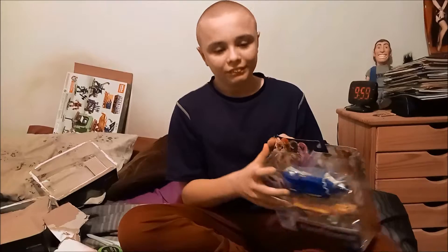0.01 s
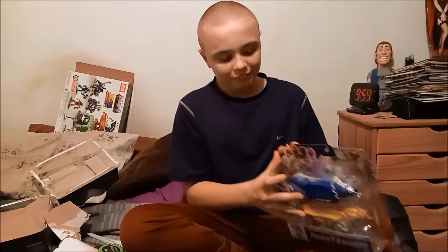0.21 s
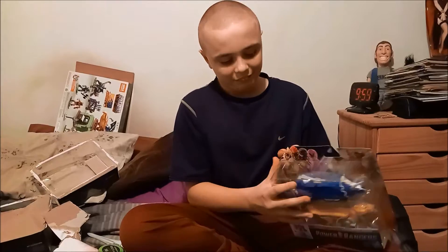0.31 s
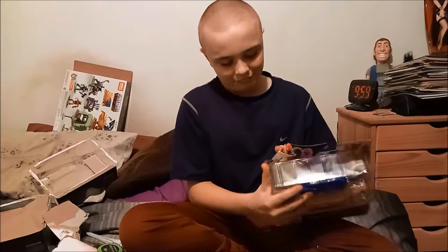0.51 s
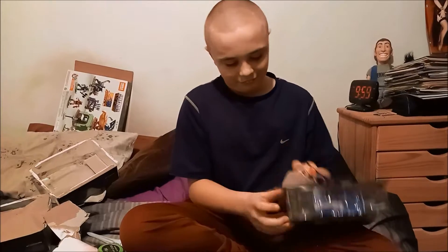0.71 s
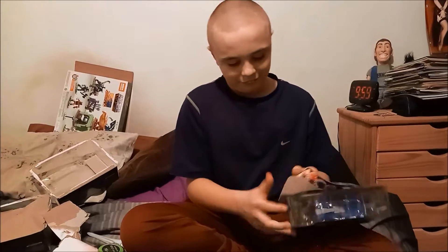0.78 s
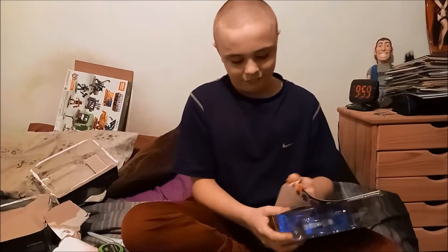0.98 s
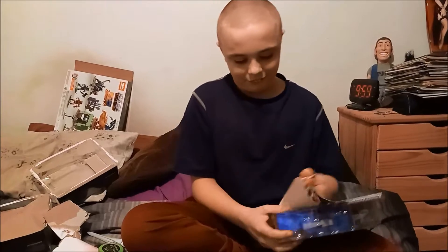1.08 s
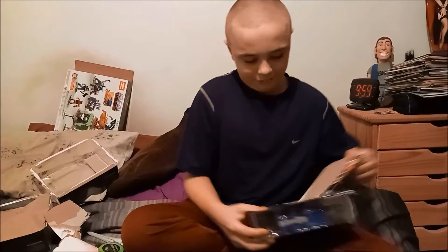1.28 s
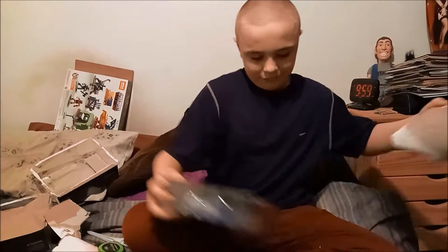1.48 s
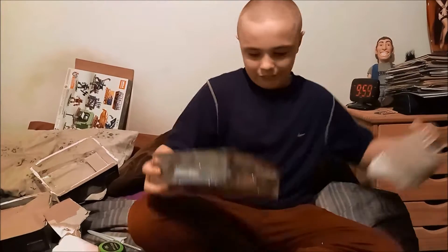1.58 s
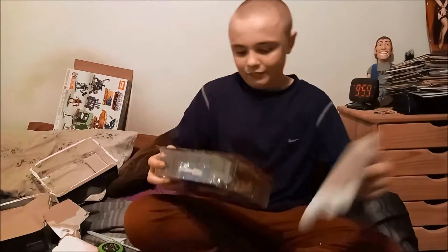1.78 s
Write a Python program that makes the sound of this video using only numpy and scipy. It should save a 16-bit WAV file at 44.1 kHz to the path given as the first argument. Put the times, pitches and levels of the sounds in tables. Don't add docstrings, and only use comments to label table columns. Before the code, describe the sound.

A stiff card is pulled from a hard plastic tray: faint knocks first, then dense scraping with sharp snaps and hollow thuds, ending in strong knocks and small clicks, in a small furnished bedroom, close mono microphone.

```python
import sys
import numpy as np
from scipy import signal
from scipy.fft import rfft, irfft
from scipy.io import wavfile
from scipy.ndimage import uniform_filter1d

SR = 44100
rng = np.random.default_rng(int(sys.argv[2]) if len(sys.argv) > 2 else 0)


def undo_db(level):
    steps = np.asarray(level, float) / 20
    return 10 ** steps


def wrap_up_sound(samples):
    columns = np.atleast_2d(samples).T
    tamed = np.clip(columns, -1, 1)
    steps = np.round(tamed * 32767).astype(np.int16)
    wavfile.write(sys.argv[1], SR, steps)


N = 79380

# frequency in Hz, level in dB.
FLOOR_COLOUR = [(40, -16), (300, -32), (1100, -24), (2200, -9), (4000, -10), (8000, -41), (16000, -50)]
# frequency in Hz, time to fall by 60 dB in seconds.
ROOM_DECAY = [(200, 0.16), (1000, 0.14), (4000, 0.14), (8000, 0.2), (15000, 0.2)]
# pitch in Hz, level in dB, time to fall by 60 dB in seconds.
LEFTOVER_RINGS = [(1150, -58.5, 0.23), (2120, -76.5, 1)]
# start in seconds, level in dB, pitch in Hz.
LAP_BUMPS = [(.09, -51, 91), (0.147, -44, 150), (0.25, -50, 87.5), (0.547, -33.5, 137), (0.686, -31, 134),
             (0.87, -47, 112), (1.267, -27, 111), (1.129, -36.5, 107), (1.508, -40, 101), (1.6, -52.5, 99),
             (1.74, -60.5, 89)]
# time in seconds, pitch in Hz, level in dB.
SQUEAK_PATH = [
    (0, 3530, -66),
    (.045, 3440, -66),
    (.07, 3200, -66),
    (.1, 2900, -67),
    (.145, 2600, -78),
]
# time in seconds, pitch in Hz, level in dB.
HOLLOW_PATH = [
    (.9, 740, -95),
    (1.0, 670, -52),
    (1.08, 718, -44),
    (1.14, 480, -41.5),
    (1.21, 444, -44),
    (1.29, 360, -33.5),
    (1.33, 315, -70),
    (1.4, 310, -89),
]
# start in seconds, pitch in Hz, level in dB, time to fall by 60 dB in seconds.
WALL_PINGS = [(.59, 478, -41, 0.27), (0.6383, 2450, -48, 0.025), (.643, 2460, -42, 0.034),
              (.643, 4600, -32, 0.023), (.6835, 1046, -33, 0.035), (0.709, 1020, -30, 0.039),
              (0.821, 1050, -36, 0.054), (.8445, 2270, -35.5, 0.066), (0.855, 3270, -26, 0.043),
              (.858, 5180, -33, 0.058), (1.343, 633, -16, 0.045), (1.3465, 391, -20, 0.058),
              (1.357, 520, -25.5, 0.055), (1.4595, 1150, -24, 0.033), (1.46, 623, -27, 0.026),
              (1.46, 3160, -37.5, 0.017), (1.689, 1100, -36.5, 0.032), (1.688, 1600, -38, 0.029),
              (1.689, 2250, -39.5, 0.036), (1.689, 3530, -45, 0.031), (1.689, 4790, -47, .04)]
# start in seconds, level in dB, pitch in Hz, time to fall by 60 dB in seconds.
CARD_THUDS = [(.002, -48.5, 259, 0.062), (0.095, -48.5, 520, 0.037), (0.143, -37.5, 500, 0.024),
              (0.15, -36, 430, 0.016), (0.165, -32, 372, 0.018), (0.179, -48, 400, 0.022),
              (0.193, -45, 435, 0.028), (.209, -35, 334, 0.031), (0.224, -29.5, 346, 0.025),
              (0.2441, -27.5, 429, 0.059), (0.259, -25, 500, 0.022), (0.304, -28.5, 498, 0.079),
              (0.383, -21.5, 463, 0.042), (.454, -28, 465, 0.029), (.544, -23, 489, 0.022),
              (.59, -31, 414, 0.043), (.705, -20.5, 450, 0.03), (0.863, -25.5, 440, 0.024),
              (1.093, -27.5, 475, 0.1), (1.135, -26, 475, 0.064), (1.155, -27.5, 411, 0.054),
              (1.192, -24.5, 437, 0.1), (1.222, -22, 542, 0.053), (1.25, -23, 347, 0.049),
              (1.294, -14.5, 334, 0.051), (1.338, -21.5, 630, 0.039), (1.346, -12, 428, 0.027),
              (1.457, -17, 439, 0.018), (1.52, -39.5, 223, 0.061), (1.55, -48.5, 266, 0.047)]
# pitch as a ratio to the thud's own, level in dB.
THUD_TONES = [(.3, -24.5), (.68, -4.5), (1, 5), (1.55, 0), (2.3, 4.5), (3.4, -0.5)]
# start in seconds, level in dB, pitch in Hz, bright crack in dB, dull ring in dB.
PLASTIC_SNAPS = [(.084, -56, 6100, 0, -15), (0.144, -45.5, 6770, 0, 0), (.169, -45, 1900, -6, -10),
                 (.1925, -56, 7000, -4, -3), (.2102, -51, 2600, 2, -10), (0.229, -45, 6600, -7, 2.5),
                 (0.245, -17, 1810, -5, 0), (0.3061, -23, 7700, 7.5, 0.5), (0.384, -21.5, 2860, -9, 2.5),
                 (0.546, -39.5, 6360, 11, 10), (0.5909, -34, 4100, -10, -3), (0.6377, -29, 4580, 10, -16),
                 (0.639, -24.5, 4770, -1, -20), (0.6421, -20.5, 6730, -12, -5.5),
                 (0.6835, -31, 6700, 1, -4.5), (0.706, -30, 6600, 3, -1), (0.779, -33, 4900, 3, -6),
                 (0.825, -27, 2730, -8, -10), (.844, -21.5, 2460, -9, -4), (0.858, -18.5, 7100, 2.5, -29),
                 (0.865, -25, 5200, -1, -37), (1.079, -30, 6150, -3, -30), (1.3192, -25, 5300, 5, 0.5),
                 (1.4602, -36.5, 6800, -3, -12), (1.5177, -50, 6520, -4, -20),
                 (1.5362, -48, 6700, -2.5, -20), (1.606, -45, 6600, 5.5, -37), (1.6483, -41, 7600, -1, -31),
                 (1.6665, -47, 6140, 6, -6), (1.689, -27.5, 6610, -3, -7.5), (1.693, -38, 5600, -16, -15)]
# frequency in Hz, level in dB.
CRACK_COLOUR = [(300, -37), (1200, -22.5), (2300, 7.5), (4000, 5.5), (8000, 8), (11000, 1.5), (16000, -19)]
# time in seconds, rub level in dB, weight on the card in dB, sharpness of the edge in dB.
RUB_PATH = [(0, -53, -67.5, -13), (.13, -76, -74, -12), (.2445, -60.5, -51, 10.5), (.2465, -41, -37.5, 7.5),
            (.3, -47, -54, 7.5), (.315, -36.5, -42.5, 6.5), (.37, -33, -73, 0.5), (.45, -28.5, -44, 1.5),
            (.52, -33, -55, 1.5), (.57, -46.5, -49.5, -12.5), (.755, -47, -55.5, 3),
            (.838, -35.5, -49, 0.5), (.852, -26.5, -43.5, -1.5), (1.02, -33, -54.5, 0),
            (1.11, -23.5, -41, 1.5), (1.18, -30.5, -36, -0.5), (1.315, -23, -42, -6),
            (1.4, -47.5, -53.5, -20)]
# frequency in Hz, level in dB.
EDGE_COLOUR = [(120, -63), (300, -9.5), (700, -2.5), (2000, -3), (4000, -4.5), (8000, -1), (16000, -5.5)]
# frequency in Hz, level in dB.
CARD_COLOUR = [(60, -11), (110, -4), (250, -2), (430, 1), (700, -7.5), (1100, -17), (2500, -21),
               (9000, -72)]
# start in seconds, length in seconds, level in dB, sharpness in dB.
FINGER_SCUFFS = [
    (0.077, 0.056, -57.5, -6),
    (0.125, 0.068, -56, -5.5),
    (0.212, 0.066, -57.5, 5),
    (0.585, 0.041, -36.5, -4),
    (0.68, 0.074, -37.5, 0),
    (1.436, 0.21, -61, 3),
    (1.6, 0.075, -82, 3),
    (1.679, 0.069, -42.5, -20),
]
# frequency in Hz, level in dB.
MIC_COLOUR = [(30, -24), (60, -11), (100, -2.5), (200, -1), (3500, 4), (5000, 5), (6300, 8.5), (7400, 6),
              (8300, -7), (10500, 1.5), (12000, -2), (13600, -6), (14700, 4), (15800, 6), (16100, -47),
              (17200, -53)]

FLOOR_DB = -78
ROOM_DB, RUB_ROOM_DB, KNOCK_ROOM_DB, RING_ROOM_DB = -2, -8.5, -2.5, -8
SLIPS_PER_S, CREAKS_PER_S = 10000, 900
SLIP_SPREAD_DB, CLUMP_DB, PATCH_DB = 0.5, 1.65, 2
RUB_DB, CARD_DB, RUB_END_DB_PER_S = -3.5, 1.5, 66.5
EDGE_SPLIT_HZ = 6350
SNAP_DB, RING_DB, RING_WIDTH_HZ = -3.5, -3.5, 380
CRACK_S, CRACK_RISE_S = 0.0031, 0.0004
THUD_LAG_S = 0.0027


def evened(x):
    return x / np.sqrt(np.mean(x ** 2) + 1e-20)


def read(points, hz):
    f, value = np.transpose(points)
    return np.interp(np.log(hz + 1), np.log(f + 1), value)


def along(table, col):
    rows = np.array(table)
    return np.interp(np.arange(N) / SR, rows[:, 0], rows[:, col])


def add(mix, s, sound):
    part = mix[round(s * SR):][:len(sound)]
    part += sound[:len(part)]


def coloured(x, points):
    log_gain = np.log(undo_db(read(points, abs(np.fft.fftfreq(4096, 1 / SR))) / 2))
    taps = np.fft.ifft(np.exp(2 * np.conj(signal.hilbert(log_gain)))).real[:2048]
    return signal.oaconvolve(x, taps)[:len(x)]


def resonate(x, hz, width):
    turn = np.exp(2j * np.pi * np.cumsum(hz * np.ones(len(x))) / SR)
    r = np.exp(-np.pi * width / SR)
    return 2 * (turn * signal.lfilter([1 - r], [1, -r], x / turn)).real


def room_floor():
    return undo_db(FLOOR_DB) * evened(coloured(rng.standard_normal(N), FLOOR_COLOUR))


def room(x):
    taps = np.zeros(SR // 2)
    at = np.arange(130, SR // 2 - 20, 12)
    taps[at + rng.integers(0, 12, at.shape)] = rng.choice([-1., 1.], at.shape)
    hz, t, z = signal.stft(taps, SR, nperseg=128)
    t60 = np.maximum(read(ROOM_DECAY, hz), .03)[:, None]
    tail = signal.istft(z * undo_db(-60 * t / t60), SR, nperseg=128)[1]
    level = abs(rfft(tail[:4096])) ** 2
    bumps_db = 10 * np.log10(uniform_filter1d(level, size=5) / uniform_filter1d(level, size=60))
    tail = coloured(tail, np.c_[np.fft.rfftfreq(4096, 1 / SR), -bumps_db])
    return signal.fftconvolve(x, tail / np.linalg.norm(tail))[:N]


def leftover():
    t = np.arange(N) / SR
    return sum(undo_db(db - 60 * t / t60) * np.sin(2 * np.pi * hz * t) for hz, db, t60 in LEFTOVER_RINGS)


def bump(db, hz):
    t = np.arange(15000) / SR
    return undo_db(db - 60 * t / 0.11) * (1 - np.exp(-t / 0.0057)) * np.sin(2 * np.pi * hz * t)


def slips(rate):
    clump = evened(uniform_filter1d(rng.standard_normal(N), size=150))
    spread = np.minimum(rng.exponential(1, N), 3)
    size = undo_db(SLIP_SPREAD_DB * spread + CLUMP_DB * np.clip(clump, -2, 2))
    happens = rng.random(N) < rate / SR
    return evened(size * happens * rng.choice([-1., 1.], N))


def squeak():
    t = np.arange(N) / SR
    wobble = 1 + 0.0043 * evened(uniform_filter1d(rng.standard_normal(N), size=80))
    turns = 2 * np.pi * np.cumsum(along(SQUEAK_PATH, 1) * wobble) / SR
    octave = undo_db(3 - 260 * t) * np.sin(2 * turns)
    sounding = t < SQUEAK_PATH[-1][0]
    return sounding * undo_db(along(SQUEAK_PATH, 2)) * (np.sin(turns) + octave)


def hollow():
    hz = along(HOLLOW_PATH, 1)
    air = resonate(resonate(slips(CREAKS_PER_S), hz, 68), hz, 250)
    return undo_db(along(HOLLOW_PATH, 2)) * evened(air)


def ping(hz, db, t60):
    t = np.arange(9000) / SR
    return undo_db(db - 60 * t / max(t60, .01)) * (1 - np.exp(-t / 0.00089)) * np.sin(2 * np.pi * hz * t)


def thud(chance, db, hz, t60):
    t = np.arange(12000) / SR
    tones = np.zeros(len(t))
    for (ratio, tone_db), c in zip(THUD_TONES, chance):
        fade = undo_db(tone_db - 60 * t * ratio / max(t60, .01))
        tones += fade * np.sin(2 * np.pi * hz * ratio * (1 + 0.073 * c) * t)
    return undo_db(db - 5) * tones * (1 - np.exp(-t / 0.0011))


def snap(noise, db, hz, crack_db, dull_db):
    t = np.arange(len(noise)) / SR
    shape = np.minimum(t / CRACK_RISE_S, 1) * np.exp(-(t / CRACK_S) ** 3)
    burst = noise * shape
    for _ in range(8):
        z = rfft(burst)
        burst = irfft(z / (abs(z) + 1e-9), len(t))
        burst = np.sign(burst) * np.sqrt(abs(burst)) * shape
    ring = resonate(resonate(burst, hz, RING_WIDTH_HZ), hz, 2500)
    dull = resonate(burst, 904, 210) + resonate(burst, 1500, 135) + resonate(burst, 2200, 570)
    dull = resonate(dull, 2620, 3900)
    thin = signal.sosfilt(signal.butter(2, 0.46 * hz, "high", fs=SR, output="sos"), burst)
    crack = coloured(thin, CRACK_COLOUR)

    def at_peak(part, part_db):
        return undo_db(db + SNAP_DB + part_db) * part / abs(part).max()

    hit = at_peak(crack, crack_db) + at_peak(dull, dull_db)
    ring = at_peak(ring, RING_DB)
    return hit + ring, hit + undo_db(RING_ROOM_DB) * ring


def patchy(x):
    z = signal.stft(x, nperseg=256)[2]
    patches = uniform_filter1d(rng.standard_normal(z.shape), size=4, axis=0)
    patches = evened(uniform_filter1d(patches, size=14, axis=1))
    return signal.istft(z * undo_db(PATCH_DB * patches), nperseg=256)[1][:N]


def rub():
    t = np.arange(N) / SR
    after = undo_db(-RUB_END_DB_PER_S * np.maximum(t - RUB_PATH[-1][0], 0))
    edge = evened(patchy(coloured(slips(SLIPS_PER_S), EDGE_COLOUR)))
    low = signal.sosfiltfilt(signal.butter(4, EDGE_SPLIT_HZ, fs=SR, output="sos"), edge)
    high = edge - low
    scuffs = np.zeros(N)
    for s, length, db, sharp_db in FINGER_SCUFFS:
        swell = np.sin(np.pi * np.clip((t - s) / length, 0, 1) ** 0.58) ** 2
        scuffs += undo_db(db) * swell * (low + undo_db(sharp_db) * high)
    scrape = after * undo_db(along(RUB_PATH, 1)) * (low + undo_db(along(RUB_PATH, 3)) * high)
    body = evened(coloured(slips(CREAKS_PER_S), CARD_COLOUR))
    creak = after * undo_db(along(RUB_PATH, 2) + CARD_DB) * body
    return undo_db(RUB_DB) * (scrape + scuffs) + creak


def scene():
    floor = room_floor()
    steady = leftover() + squeak() + hollow() + rub()
    wet = room(undo_db(RUB_ROOM_DB) * steady)
    snaps, sent, knocks = np.zeros((3, N))
    for s, db, hz in LAP_BUMPS:
        add(knocks, s, bump(db, hz))
    for s, hz, db, t60 in WALL_PINGS:
        add(knocks, s, ping(hz, db, t60))
    for s, db, hz, t60 in CARD_THUDS:
        chance = rng.standard_normal(len(THUD_TONES))
        add(knocks, s + THUD_LAG_S, thud(chance, db, hz, t60))
    for s, db, hz, crack_db, dull_db in PLASTIC_SNAPS:
        near, far = snap(rng.standard_normal(2000), db, hz, crack_db, dull_db)
        add(snaps, s, near)
        add(sent, s, far)
    echoes = undo_db(ROOM_DB) * room(sent + undo_db(KNOCK_ROOM_DB) * knocks)
    mono = floor + steady + wet + knocks + snaps + echoes
    return np.array([mono, mono])


def low_pass(x):
    return signal.sosfilt(signal.butter(12, 17110, fs=SR, output="sos"), x)


def record(dry):
    heard = np.tanh(coloured(dry[0], MIC_COLOUR))
    return low_pass(np.array([heard, heard]))


dry = scene()
out = record(dry)
wrap_up_sound(out)
```